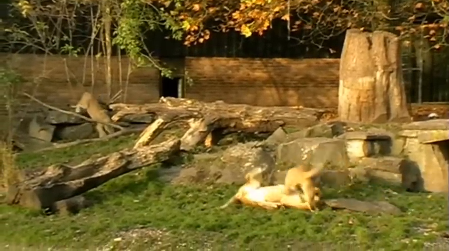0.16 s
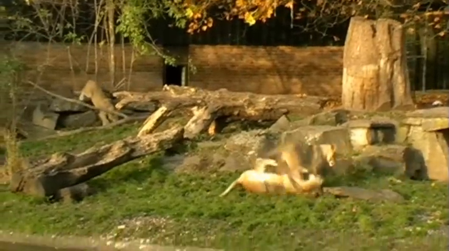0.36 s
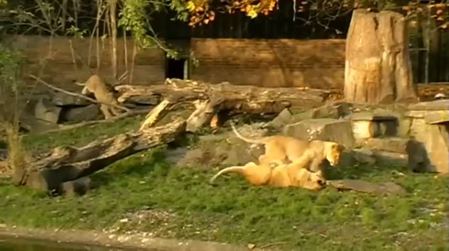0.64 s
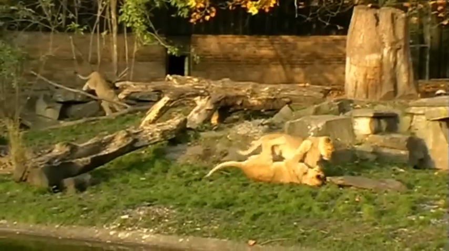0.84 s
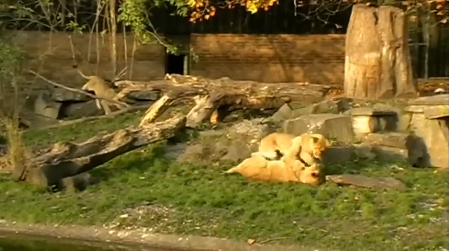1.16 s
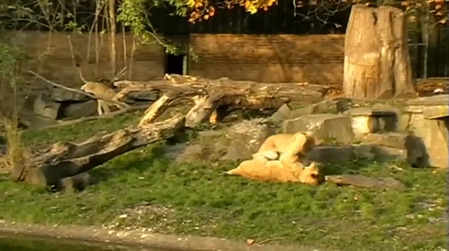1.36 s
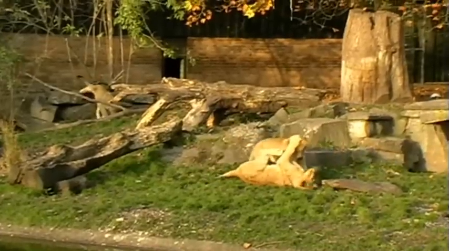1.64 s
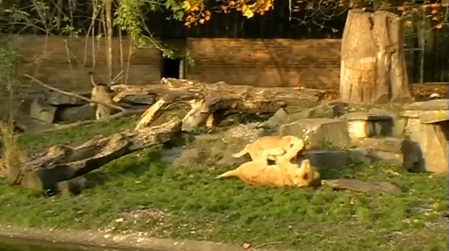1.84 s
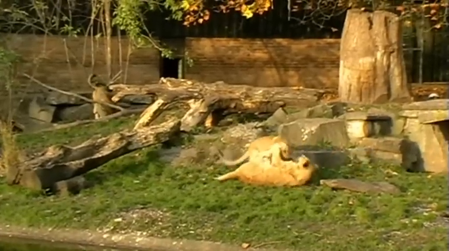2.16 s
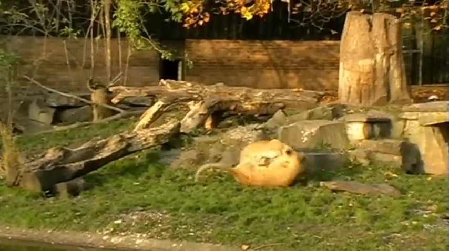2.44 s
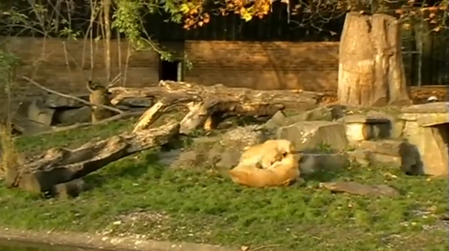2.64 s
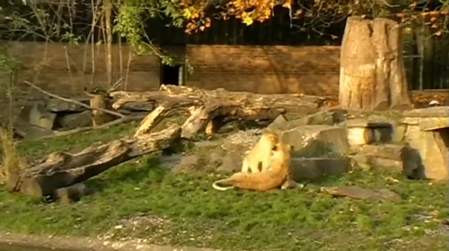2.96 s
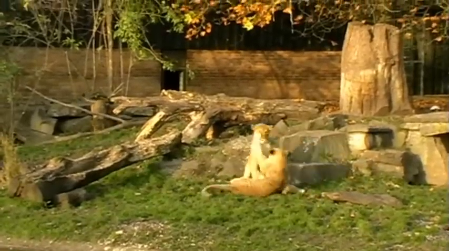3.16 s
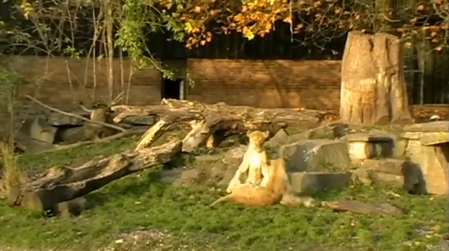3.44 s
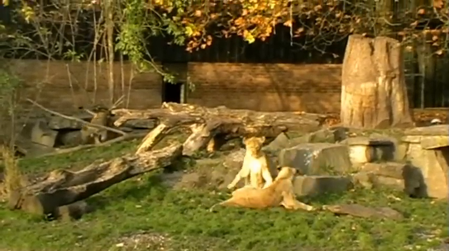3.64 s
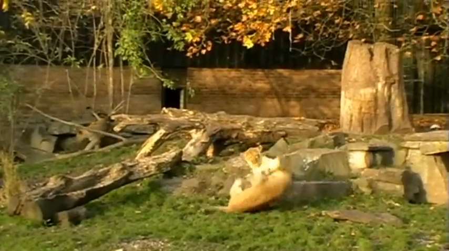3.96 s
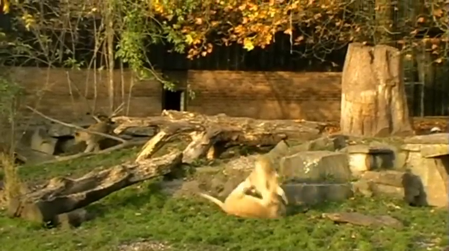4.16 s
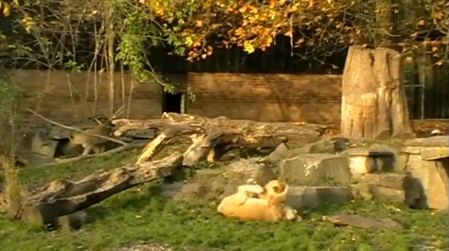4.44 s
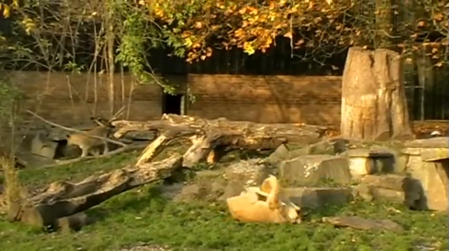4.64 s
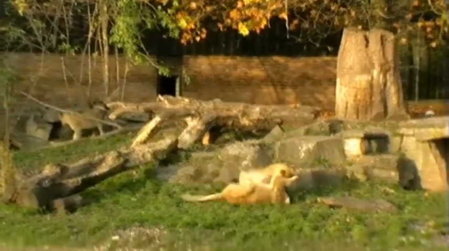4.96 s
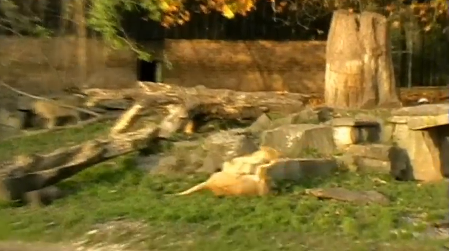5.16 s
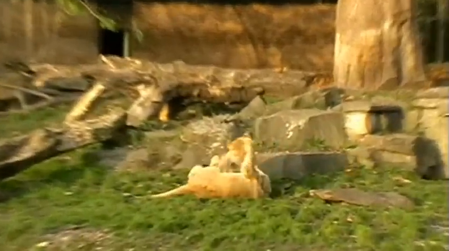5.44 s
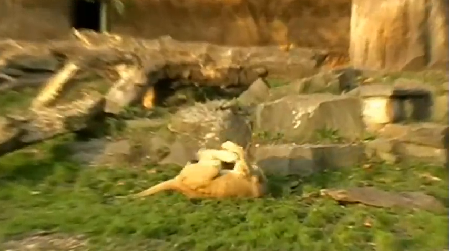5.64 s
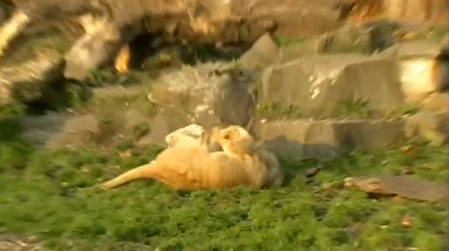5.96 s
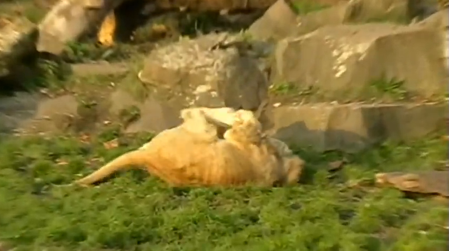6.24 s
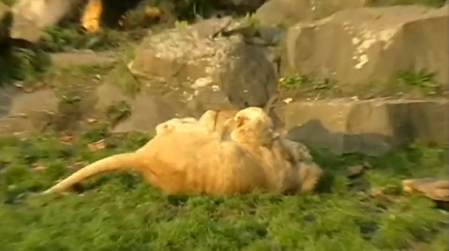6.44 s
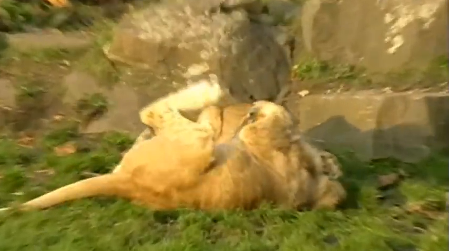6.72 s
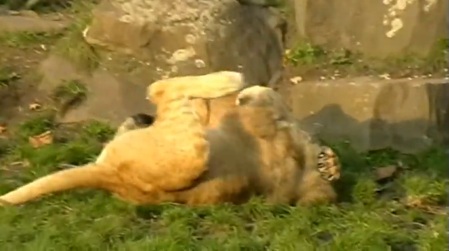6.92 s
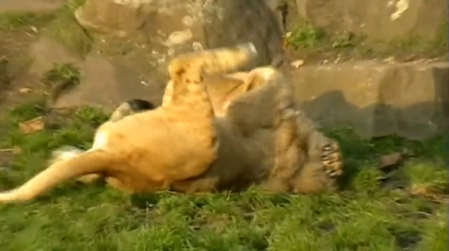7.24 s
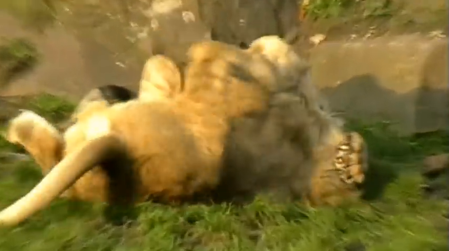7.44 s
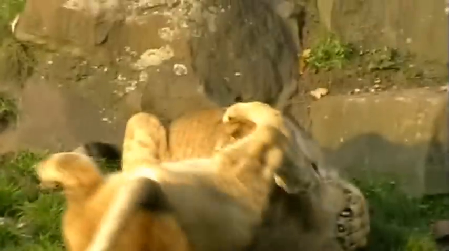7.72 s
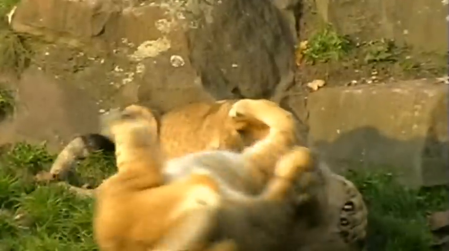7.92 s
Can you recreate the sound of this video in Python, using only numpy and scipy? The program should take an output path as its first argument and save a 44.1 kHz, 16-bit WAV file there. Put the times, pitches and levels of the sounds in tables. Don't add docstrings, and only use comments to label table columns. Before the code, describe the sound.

A small camera microphone catches a lion duet already under way: a higher, ringing roar alternates with a deeper, raspy grunt, reverberating for about a second. After four seconds the roars weaken and separate grunts remain, roughly one a second. Close scuffs, a leafy step or two and sharp gravel clicks come in the second half, with a tiny squeak, over constant low far city rumble and soft hiss.

```python
import sys
import numpy as np
from scipy import signal
from scipy.fft import rfft, irfft, next_fast_len
from scipy.io import wavfile
from scipy.ndimage import uniform_filter1d

SR = 44100
rng = np.random.default_rng(int(sys.argv[2]) if len(sys.argv) > 2 else 0)


def to_wav(s):
    ch = np.atleast_2d(s).T
    pcm = np.round(np.clip(ch, -1, 1) * 32767)
    wavfile.write(sys.argv[1], SR, pcm.astype(np.int16))


def gain_from_db(level_db):
    decades = np.asarray(level_db, float) / 20
    return 10 ** decades


N = 356724

# freq_hz, level_db per Hz
CITY_SPECTRUM = [(15, -76.5), (25, -37), (54, -18.5), (90, -2.5), (140, -2), (200, -1), (300, -13),
                 (450, -16.5), (1000, -14.5), (1500, -18.5), (2000, -25.5), (2800, -32.5), (4500, -37.5),
                 (10000, -42), (15100, -48)]
# freq_hz, likeness 0-1
LIKENESS = [(60, 0.98), (130, 0.98), (290, 0.97), (630, 0.9), (1390, 0.83), (3050, 0.43), (6700, 0.74),
            (14700, 0.46)]
# time_s, pitch_hz, effort_db (level of the fundamental)
LONG_ROARS = [
    [(-0.1, 195, -7.5), (0.0, 194.2, -8), (0.066, 193.7, -25.5), (0.106, 195.9, -20.5), (0.16, 189.2, -25),
     (0.262, 178, -18.5), (0.472, 175.6, -26.5), (0.514, 171.4, -18), (0.55, 185, -41)],
    [(0.84, 194.1, -24.5), (0.932, 197.2, -20.5), (1.084, 192.4, -10.5), (1.15, 193.5, -33),
     (1.184, 198.1, -18.5), (1.276, 191.8, -32.5), (1.318, 162.1, -23.5), (1.38, 152.6, -31.5)],
    [(1.89, 190.3, -27), (1.95, 191.5, -13), (2.008, 194.4, -15), (2.052, 192.1, -10.5),
     (2.104, 193, -28.5), (2.224, 176.3, -29), (2.36, 191.2, -35.5)],
    [(2.8, 181.5, -26), (2.91, 185.3, -9), (2.98, 179.9, -9.5), (3.035, 183.1, -24), (3.07, 180.3, -13.5),
     (3.19, 179.9, -11), (3.24, 178.2, -34), (3.42, 182.5, -21), (3.58, 180.6, -27)],
]
TIRED_ROARS = [
    [(3.82, 165.8, -34), (3.872, 174, -18), (3.948, 162.6, -31.5), (3.988, 181.9, -25), (4.042, 165, -32),
     (4.1, 165.8, -33)],
    [(5.03, 154.4, -36), (5.102, 159.4, -32), (5.218, 159.3, -21.5), (5.32, 160, -31.5)],
    [(6.8, 182.6, -50), (6.848, 185.8, -31), (6.986, 169.1, -44.5), (7.066, 189.3, -32.5),
     (7.08, 198.5, -51.5)],
]
# upper_rasp_db, upper_loss_db per s, chest_rasp_db
ROAR_VOICE = [(-31, 16.5, -21), (-36.5, -1.5, -21), (-36.5, 6, -23), (-39, -1.5, -31), (-36, -4, -27),
              (-36, 17, -31), (-44.5, 5, -36.5)]
# time_s, roughness 0-1
ROAR_ROUGHNESS = [(0, .5), (.8, .55), (1.0, .45), (1.35, .5), (2.0, .45), (2.4, .55), (2.8, .25),
                  (3.0, .33), (3.25, .55), (4.1, .55), (5.0, .3), (5.3, .4)]
# freq_hz, width_hz, level_db
ROAR_UPPER = [(538, 55, -2.5), (750, 140, -4), (962, 87, 5), (1070, 126, 4), (1413, 223, -5.5),
              (1541, 58, -3), (1646, 53, -3.5), (1870, 270, -15), (2255, 350, -17), (3140, 2600, -31.5),
              (5820, 710, -25.5), (7200, 2500, -33)]
ROAR_CHEST = [(165, 21, 8), (238.7, 41.6, -1.5), (431.3, 41.5, -1.5), (573, 50, -16.5)]
# time_s, pitch_hz, level_db
OCTAVES = [
    [(0.2, 382.5, -36), (0.202, 382.5, -47), (0.212, 376.5, -40), (0.246, 364.5, -28.5),
     (0.426, 364.9, -28), (0.436, 364.5, -25), (0.45, 364.8, -32.5), (0.588, 364.5, -34),
     (0.62, 364.5, -48)],
    [(2.9, 369.8, -39.5), (2.998, 359.0, -22), (3.05, 368.7, -29.5), (3.084, 365.6, -20.5),
     (3.344, 364.9, -25), (3.518, 364.8, -33.5), (3.596, 382.8, -42), (3.614, 380.2, -31),
     (3.7, 382.6, -53)],
]
# start_s, length_s, freq_hz, width_hz, level_db
RINGS = [(0.0, 0.39, 990, 40, -37), (-0.5, 0.22, 1110, 50, -38), (0.5, 0.072, 1130, 50, -32.5),
         (1, 0.24, 1340, 120, -43), (1.2, .3, 900, 40, -42), (2.0, 0.18, 950, 40, -37),
         (2.82, 0.095, 1270, 50, -44.5), (3.5, 0.11, 1700, 60, -51.5), (2.9, 0.15, 915, 30, -38),
         (3.2, .15, 960, 21, -33.5), (4, 0.135, 1090, 54, -43.5), (3.5, .08, 1310, 37, -46),
         (4, 0.079, 246, 25, -35.5), (4.5, 0.24, 375, 27, -41.5), (5, .08, 1085, 40, -38.5),
         (5, 0.197, 940, 27, -39), (0.8, .28, 454.3, 35.2, -34.5), (1.15, .25, 373, 30, -38),
         (2, .16, 450, 29, -36), (1.1, .38, 5640, 500, -64.5), (2.5, .26, 5650, 500, -66.5),
         (5, .12, 5600, 500, -66), (1.1, .25, 4500, 200, -64.5), (0.3, 0.092, 700, 22, -39.5),
         (1.85, .3, 700, 22, -42), (1.5, .22, 1064, 90, -36), (1.44, .2, 1310, 43, -41.5),
         (5.5, 0.15, 402, 35, -35), (0.66, .17, 258, 43, -36.5), (2.0, .3, 370, 40, -40)]
# start_s, peak_db, left_right_db, ring_hz, t60_s
SNAPS = [(0.0, -15.5, 4.5, 2980, 0.0052), (2.405, -45, 4.5, 3140, 0.04), (3.958, -41.5, 7.5, 3200, 0.04),
         (4.0308, -27.5, -2, 7800, 0.057), (4.0435, -30.5, -3.5, 8990, 0.03),
         (4.0475, -34.5, -1.5, 7450, 0.03), (4.091, -27.5, -5, 2947, 0.074),
         (5.1392, -39.5, -2, 5673, 0.089), (5.7141, -27, 7, 3174, 0.05), (6.3001, -44.5, -3.5, 8280, 0.047),
         (6.6244, -44.5, 20, 3116, 0.068), (6.648, -34.5, -1, 4200, 0.069), (6.716, -44, -6.5, 4530, 0.045),
         (7.7333, -47.5, -14, 3140, 0.044)]
# time_s, pitch_hz, effort_db (level of the fundamental)
LONG_GRUNTS = [
    [(0.08, 145.1, -46.5), (0.16, 148.1, -18.5), (0.244, 164.7, -18.5), (0.32, 161.7, -19),
     (0.358, 162.6, -14.5), (0.526, 143, -18.5), (0.6, 135.5, -45), (0.684, 151.6, -22.5),
     (0.72, 156.3, -31.5)],
    [(1.45, 143.7, -52), (1.494, 145.5, -22.5), (1.668, 146.4, -15), (1.72, 132.2, -34),
     (1.814, 130.3, -23), (1.88, 133, -71.5)],
    [(3.23, 160.9, -25), (3.258, 163.5, -16), (3.336, 161.2, -13), (3.36, 160, -31), (3.386, 154.7, -12.5),
     (3.426, 156.9, -27.5), (3.6, 158, -29), (3.72, 160, -39)],
]
SHORT_GRUNTS = [
    [(4.26, 139.3, -36.5), (4.298, 138.5, -37), (4.302, 138.7, -30), (4.334, 135.5, -23),
     (4.388, 132.6, -24), (4.404, 132.3, -18.5), (4.476, 132.6, -19), (4.486, 132.7, -26.5),
     (4.62, 132.5, -42)],
    [(5.3, 139.9, -28), (5.322, 137.9, -40), (5.332, 135.5, -28), (5.382, 134.0, -26),
     (5.464, 133.2, -27.5), (5.556, 132.6, -18.5), (5.628, 134.1, -30), (5.634, 134.9, -40),
     (5.7, 132.4, -36)],
    [(6.39, 143.6, -38), (6.426, 139.1, -30), (6.434, 138, -41), (6.45, 135.6, -25.5), (6.504, 132.3, -24),
     (6.598, 132.4, -19.5), (6.654, 133, -41), (6.692, 132.6, -26), (6.7, 132.6, -35)],
    [(7.43, 140.8, -44), (7.464, 140.1, -28.5), (7.55, 132.8, -24), (7.638, 132.5, -23.5),
     (7.66, 132.6, -48), (7.67, 132.6, -29.5), (7.75, 132.3, -31), (7.758, 132.5, -42), (7.8, 132.5, -34)],
]
# rasp_db, rasp_loss_db per s, mouth_db, narrowing_s before the end
GRUNT_VOICE = [(-26, 2, -40, 0.21), (-21.5, 11.5, -35.5, 0.14), (-19, 33, -38.5, 0.31),
               (-22.5, 27, -34, 0.2), (-18, 29.5, -36, 0.18), (-25.5, -4, -30.5, 0.027),
               (-22, 22.5, -38, 0.2)]
# freq_hz, width_hz, level_db
GRUNT_THROAT = [(160, 35, 6.5), (355.3, 23.4, 4.5), (402, 47, -2.5), (466.4, 24, -10), (1033, 76, -5),
                (702, 285, -13), (1288, 68, -13.5), (1467, 130, -25), (1943, 40, -19), (2184, 120, -25.5),
                (3010, 520, -36)]
GRUNT_MOUTH = [(686, 30, 6), (818, 60, -3), (3350, 120, -24.5), (4370, 180, -29)]
# time_s, air_flow_db
BREATHS = [
    [(0.04, -60), (0.192, -47.5), (0.3, -51.5), (0.312, -47.5), (0.558, -50), (0.598, -44), (0.678, -55),
     (0.75, -72.5)],
    [(1.4, -63), (1.484, -49.5), (1.658, -52), (1.694, -45), (1.78, -55.5), (1.812, -44), (1.85, -55.5),
     (1.95, -66)],
    [(3.1, -57), (3.11, -53), (3.176, -61), (3.304, -52), (3.352, -61.5), (3.426, -48.5), (3.496, -53.5),
     (3.65, -64)],
    [(4.23, -71), (4.246, -62.5), (4.332, -53), (4.466, -55.5), (4.508, -62), (4.538, -57), (4.6, -69),
     (4.62, -61)],
    [(5.25, -56), (5.302, -58), (5.312, -51.5), (5.52, -51.5), (5.522, -44), (5.584, -55.5), (5.62, -44),
     (5.7, -62)],
    [(6.38, -78), (6.422, -53.5), (6.484, -53), (6.598, -51), (6.608, -54), (6.63, -47)],
    [(7.42, -78), (7.438, -63), (7.474, -56.5), (7.592, -53), (7.638, -61), (7.682, -51.5), (7.81, -74),
     (7.82, -69)],
]
# freq_hz, level_db per Hz
BREATH_SPECTRUM = [(1530, -50.5), (2600, -7), (2860, -3), (3890, -5.5), (4100, -11), (4410, -5),
                   (4920, -12.5), (6410, -8), (6950, -9), (8720, -11.5), (10300, -10), (12600, -17),
                   (14400, -27.5), (15000, -39.5)]
# freq_hz, t60_s, echo_db
DEN_WALLS = [(144, 0.85, 7.5), (415, 1.09, 12.5), (970, 1.12, 7), (2500, 1, 6.5), (7000, 0.19, 7)]
# start_s, level_db, t60_s, length_s, left_right_db
FOOTSTEPS = [
    (3.968, -40, 2.007, 0.015, -3),
    (3.989, -36.5, 0.3, 0.025, -5),
    (4.026, -42, 0.89, .145, -5.5),
    (5.123, -52, 3.7, 0.089, 4),
    (5.715, -33.5, 0.17, 0.037, 7),
    (5.755, -45.5, 1, 0.2, 1.5),
    (6.641, -27, 0.27, .07, 5),
    (6.71, -38, 1.104, .31, 0.5),
    (7.092, -56, 3.4, 0.147, -1),
]
# freq_hz, level_db per Hz
LEAF_SPECTRUM = [(1060, 10.5), (1800, 2.5), (2060, 4), (2230, 4), (3560, 4), (4450, 5), (8280, 0),
                 (13800, -6), (15000, -31)]
# start_s, length_s, first_pitch_hz, last_pitch_hz, level_db
SQUEAK = (4.068, .085, 2235, 2375, -53.5)
WHISTLES = [
    (4.19, .07, 8700, 8080, -72),
    (6.0, .24, 6950, 7050, -79),
]
SQUEAK_PARTIALS_DB = [-14, 0, -2, -7, -11]

EFFORT_MEAN_DB = -22
TONE_EDGE_S = 0.036


def rms_one(x):
    return x / np.sqrt(np.mean(x ** 2) + 1e-20)


def in_time(calls):
    s, *columns = np.concatenate(calls).T
    return [np.interp(np.arange(N) / SR, s, c) for c in columns]


def at_hz(points, hz, column=1):
    points = np.array(points)
    return np.interp(np.log(np.maximum(hz, 1)), np.log(points[:, 0]), points[:, column])


def drift(rate):
    r = np.exp(-80 * np.pi * rate / SR)
    white = rng.standard_normal(N // 40 + 2002)
    slow = signal.lfilter([1], [1, -2 * r, r * r], white)[2000:]
    return np.interp(np.arange(N) / 40, np.arange(len(slow)), rms_one(slow))


def coloured(white, spectrum):
    size = next_fast_len(N, True)
    gain = gain_from_db(at_hz(spectrum, np.fft.rfftfreq(size, 1 / SR)))
    return rms_one(irfft(rfft(white, size) * gain, size)[..., :N])


def per_call(calls, rows):
    t = np.arange(N) / SR
    first, last = np.transpose([(c[0][0], c[-1][0]) for c in calls])
    k = np.maximum(np.searchsorted(first, t + .02) - 1, 0)
    return t - first[k], last[k] - t, np.array(rows)[k].T


def swell(since, left, attack_s, release_s):
    return np.clip((since + .015) / attack_s, 0, 1) * np.clip((left + .015) / release_s, 0, 1)


def stretch(s, length, edge_s):
    since = np.arange(N) / SR - s
    return since, np.clip(np.minimum(since, length - since) / edge_s + .5, 0, 1)


def folds(pitch_hz, rough, half, wobble):
    cycles = np.cumsum(pitch_hz * (1 + wobble * drift(30))) / SR
    whole = cycles.astype(int)
    strength = gain_from_db(1.14 * rng.standard_normal(N)[whole]) * (1 + half * (-1) ** whole)
    pulses = strength * (np.diff(whole, prepend=0) > 0)
    puffs = strength * np.exp(-3.0 * (cycles % 1)) * rng.standard_normal(N)
    rough = np.clip(rough, 0, 1)
    return 2 * np.pi * cycles, (1 - rough) * rms_one(pulses) + rough * rms_one(puffs)


def throat(x, modes, patchy_db=2.5):
    swells = [gain_from_db(patchy_db * drift(8)) if patchy_db else 1 for _ in range(min(len(modes), 3))]
    out = 0
    for k, (hz, width_hz, db) in enumerate(modes):
        r = np.exp(-1.55 * np.pi * max(width_hz, 8) / SR)
        b = np.array([1, 0, -1]) * (1 - r * r) / 2
        a = [1, -2 * r * np.cos(2 * np.pi * hz / SR), r * r]
        ringing = signal.lfilter(b, a, signal.lfilter(b, a, x))
        out = out + (-1) ** k * gain_from_db(db) * swells[k % len(swells)] * ringing
    steady = np.sqrt(abs(uniform_filter1d(out ** 2, size=2205)) + 1e-12) ** 0.59
    return rms_one(out / steady)


def wander(x):
    path_s = .00035 * drift(7.26)
    return np.interp(np.arange(N) + path_s * SR, np.arange(N), x)


def far_city():
    size = next_fast_len(N, True)
    mid, side = rfft(rng.standard_normal((2, size)))
    alike = np.clip(at_hz(LIKENESS, np.fft.rfftfreq(size, 1 / SR)), 0, 1)
    ears = np.sqrt(1 + alike) * mid + np.sqrt(1 - alike) * side * [[1], [-1]]
    return gain_from_db(-40.5 + 1.0 * drift(0.23)) * coloured(irfft(ears, size), CITY_SPECTRUM)


def octave():
    pitch, db = in_time(OCTAVES)
    since, left, _ = per_call(OCTAVES, np.zeros(len(OCTAVES)))
    phase = 2 * np.pi * np.cumsum(pitch * (1 + 0.0074 * drift(25))) / SR
    level = np.sqrt(2) * gain_from_db(db - 1.0 + 2.5 * drift(30))
    return level * np.sin(phase) * swell(since, left, attack_s=.04, release_s=0.044)


def rings(buzz):
    out = np.zeros(N)
    edge_s = .03
    for s, length, hz, width_hz, db in RINGS:
        part = np.arange(max(int((s - .1) * SR), 0), int((s + length + .1) * SR))
        t = part / SR
        window = np.clip(np.minimum(t - s, s + length - t) / edge_s + .5, 0, 1)
        out[part] += gain_from_db(db) * window * throat(buzz[part], [(hz, width_hz, 0)], patchy_db=None)
    return out


def roaring_lion():
    calls = LONG_ROARS + TIRED_ROARS
    pitch, effort_db = in_time(calls)
    since, left, (upper_db, upper_loss, chest_db) = per_call(calls, ROAR_VOICE)
    rough, = in_time([ROAR_ROUGHNESS])
    phase, buzz = folds(pitch, rough, half=0.37, wobble=.009)
    _, rattle = folds(pitch, rough=0.73, half=0.84, wobble=0.011)
    clear = np.sqrt(2) * gain_from_db(1.03 * drift(37)) * gain_from_db(effort_db) * np.sin(phase)
    clear = clear * swell(since, left, TONE_EDGE_S, TONE_EDGE_S)
    swing = effort_db - EFFORT_MEAN_DB
    upper = gain_from_db(upper_db + 0.22 * swing - upper_loss * since)
    chest = gain_from_db(chest_db - 0.058 * swing - 36.5 * since)
    rasp = upper * throat(buzz, ROAR_UPPER) + chest * throat(rattle, ROAR_CHEST)
    rasp = wander(rasp) * swell(since, left, attack_s=0.088, release_s=0.18)
    return clear + octave(), rasp + rings(buzz)


def snaps():
    out, t = np.zeros((2, N)), np.arange(4000) / SR
    noise = rng.standard_normal((len(SNAPS), 3, len(t)))
    body = signal.butter(2, [2400, 10500], "band", fs=SR, output="sos")
    top = signal.butter(3, [10500, 15500], "band", fs=SR, output="sos")
    for (s, db, pan_db, hz, t60), white in zip(SNAPS, noise):
        top_db = -2 - .9 * max(pan_db, 0)
        ears = white[0] + 0.55 * white[1:]
        crack = 0.5 * (signal.sosfilt(body, ears) + gain_from_db(top_db) * signal.sosfilt(top, ears))
        crack = crack + gain_from_db(-9) * np.sin(2 * np.pi * hz * t)
        crack = crack * (1 + 0.37 * np.exp(-t / 0.0014))
        decay = gain_from_db(db - 60 * t / max(t60, .005))
        i = round(s * SR)
        out[:, i:i + len(t)] += crack * decay * gain_from_db([[pan_db / 2], [-pan_db / 2]])
    return out


def den(x):
    t = np.arange(int(1.2 * SR)) / SR
    white, tail = rng.standard_normal((2, len(t))), 0
    for hz in 140 * 2 ** np.arange(7):
        octave_band = [hz / np.sqrt(2), hz * np.sqrt(2)]
        mid, side = signal.sosfilt(signal.butter(2, octave_band, "band", fs=SR, output="sos"), white)
        t60, alike = at_hz(DEN_WALLS, hz), np.clip(at_hz(LIKENESS, hz), 0, 1)
        unit_energy = np.sqrt(2 * np.log(1000) / t60 / SR)
        decay = gain_from_db(at_hz(DEN_WALLS, hz, column=2) - 60 * t / t60) * unit_energy
        tail = tail + decay * (mid + np.sqrt((1 - alike) / (1 + alike)) * side * [[1], [-1]])
    onset = np.clip((t - .015) / 0.0065, 0, 1)
    return signal.fftconvolve(x[None], tail * onset, axes=1)[:, :N]


def breath():
    flow_db, = in_time(BREATHS)
    since, left, _ = per_call(BREATHS, np.zeros(len(BREATHS)))
    air = coloured(rng.standard_normal(N), BREATH_SPECTRUM)
    return gain_from_db(flow_db + 0.5) * swell(since, left, attack_s=0.035, release_s=0.051) * air


def grunting_lion():
    calls = LONG_GRUNTS + SHORT_GRUNTS
    pitch, effort_db = in_time(calls)
    since, left, (rasp_db, rasp_loss, mouth_db, lead) = per_call(calls, GRUNT_VOICE)
    phase, buzz = folds(pitch, rough=.44, half=0.28, wobble=.007)
    wave = np.sin(phase) + gain_from_db(-36.5) * np.sin(2 * phase - 1.4)
    clear = np.sqrt(2) * gain_from_db(effort_db) * gain_from_db(0.17 * drift(12)) * wave
    swing = effort_db - EFFORT_MEAN_DB
    rasp = gain_from_db(rasp_db + .1 * swing - rasp_loss * since + .7 * drift(22))
    opening_db = np.maximum(-118 * np.maximum(left - lead, 0), -21)
    mouth = gain_from_db(mouth_db + opening_db - 60.5 * np.maximum(lead - left, 0))
    clear = clear + mouth * gain_from_db(-1.5 + 1.0 * drift(25)) * np.sin(2 * phase)
    clear = clear * swell(since, left, TONE_EDGE_S, TONE_EDGE_S)
    hoarse = wander(rasp * throat(buzz, GRUNT_THROAT) + mouth * throat(buzz, GRUNT_MOUTH))
    hoarse = hoarse * swell(since, left, attack_s=0.1, release_s=0.083)
    flutter = gain_from_db(2.4 * drift(29)) * (1 + 0.18 * np.sin(phase))
    return clear, hoarse + flutter * breath()


def rustle():
    level = 0
    for s, db, t60, length, pan_db in FOOTSTEPS:
        since, window = stretch(s, length, edge_s=0.0075)
        decay = gain_from_db(db - 60 * np.maximum(since, 0) / t60)
        level = level + window * decay * gain_from_db([[pan_db / 2], [-pan_db / 2]])
    grain_happens = rng.random(N) < 5000 / SR
    grains = gain_from_db(1.0 * np.minimum(rng.exponential(1, N), 5)) * grain_happens
    white = rng.standard_normal(N) * (grains + .5) + 0.79 * rng.standard_normal((2, N))
    return level * gain_from_db(1.2 * drift(26)) * coloured(white, LEAF_SPECTRUM)


def glide(row, wobble):
    s, length, first_hz, last_hz, db = row
    since, window = stretch(s, length, edge_s=0.019)
    pitch = np.interp(since, [0, length], [first_hz, last_hz]) * (1 + wobble * drift(73.5))
    return 2 * np.pi * np.cumsum(pitch) / SR, window * gain_from_db(db + 2.8 * drift(41.5))


def squeaks():
    phase, level = glide(SQUEAK, wobble=0.0043)
    out = level * sum(gain_from_db(db) * np.sin((k + 1) * phase) for k, db in enumerate(SQUEAK_PARTIALS_DB))
    for row in WHISTLES:
        phase, level = glide(row, wobble=.004)
        out = out + level * np.sin(phase)
    return np.sqrt(2) * out * gain_from_db([[-2.2], [2.2]])


def scene():
    roar_tone, roar_rasp = roaring_lion()
    grunt_tone, grunt_rasp = grunting_lion()
    no_deep_bass = signal.butter(4, 115, "high", fs=SR, output="sos")
    rasp = signal.sosfilt(no_deep_bass, roar_rasp + grunt_rasp) + 1e-18
    treble = signal.sosfilt(signal.butter(1, 900, "high", fs=SR, output="sos"), rasp)
    direct = roar_tone + grunt_tone + gain_from_db(-1.5) * (rasp + 0.22 * treble * [[1], [-1]])
    echoes = gain_from_db(-3.5) * den(gain_from_db(-5) * roar_tone + gain_from_db(-18) * grunt_tone + rasp)
    return direct + echoes + rustle() + snaps() + squeaks() + far_city()


def top_cut(x):
    return signal.sosfilt(signal.butter(12, 15290, fs=SR, output="sos"), x)


def record(dry):
    rounded = .8 * np.tanh(dry / .8)
    edges = signal.butter(4, [35, 15600], "band", fs=SR, output="sos")
    mix = signal.sosfilt(edges, rounded)
    return top_cut(mix)


dry = scene()
out = record(dry)
to_wav(out)
```